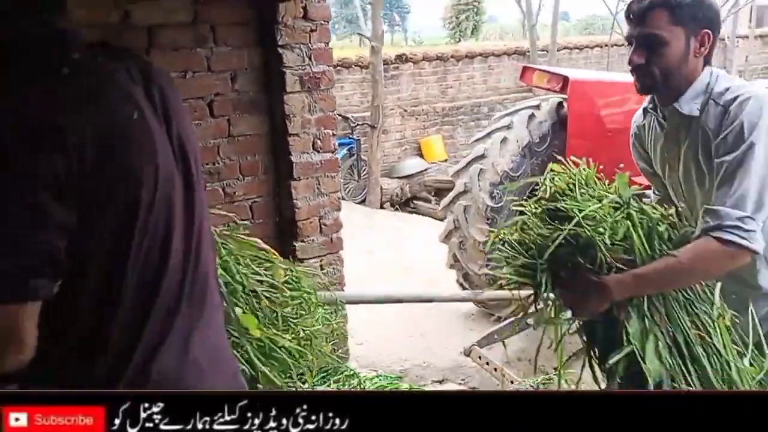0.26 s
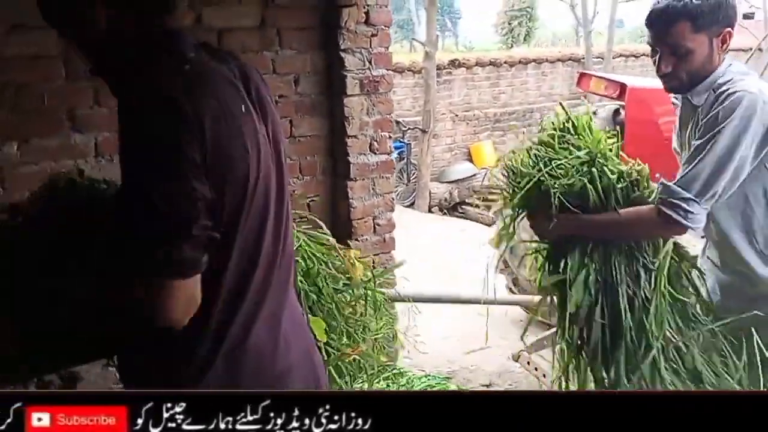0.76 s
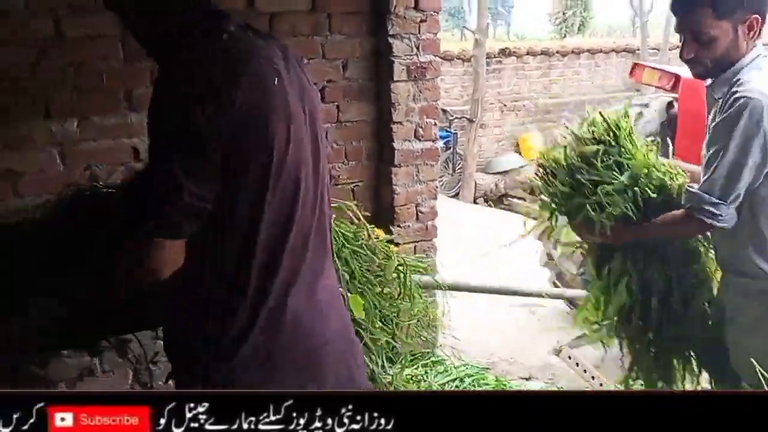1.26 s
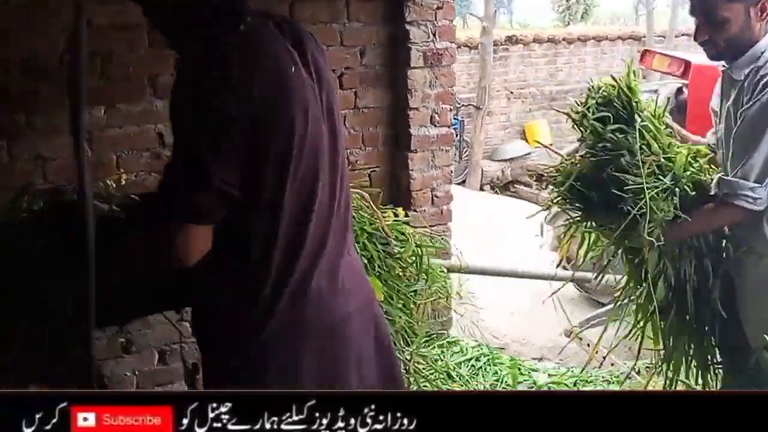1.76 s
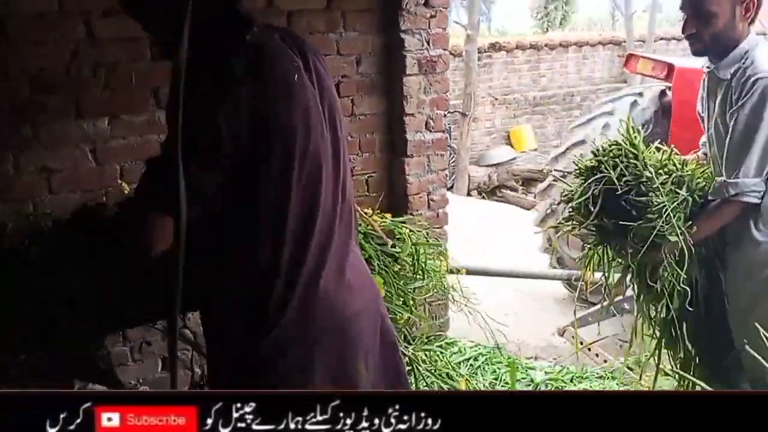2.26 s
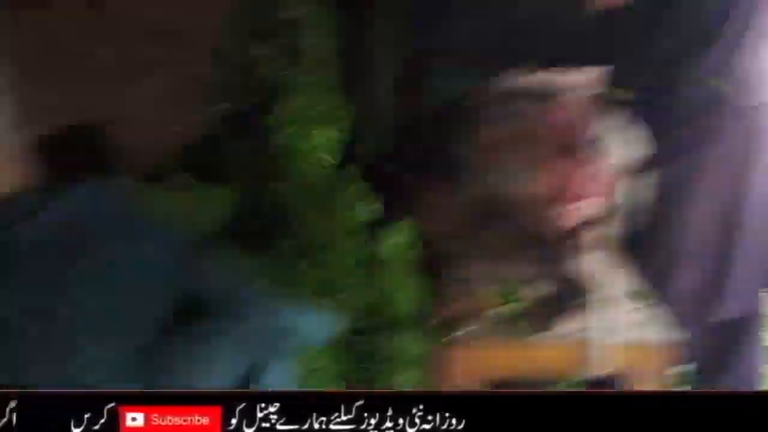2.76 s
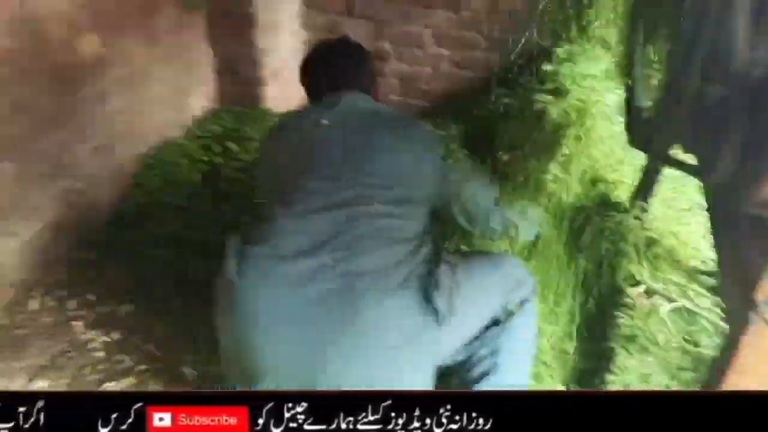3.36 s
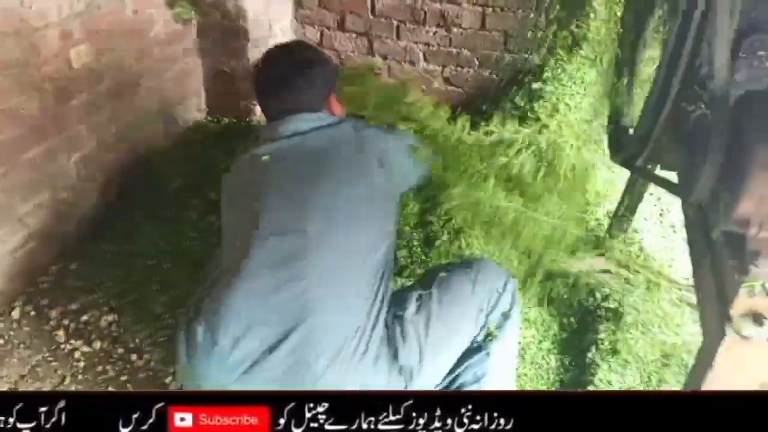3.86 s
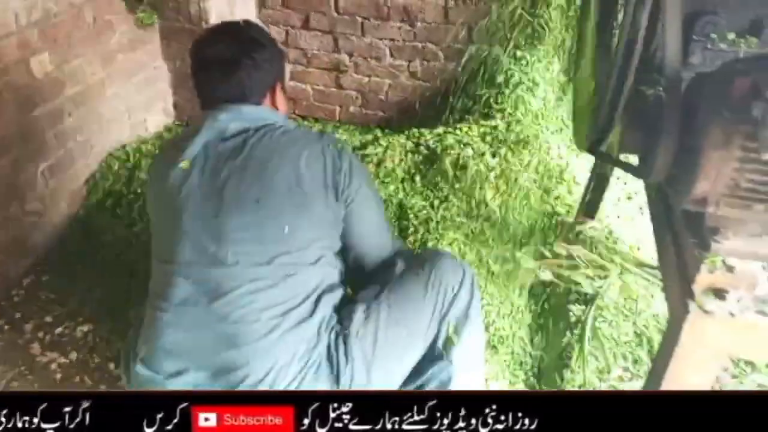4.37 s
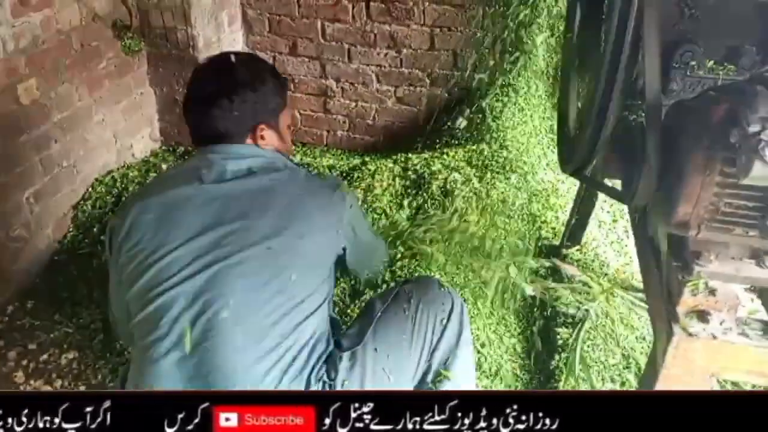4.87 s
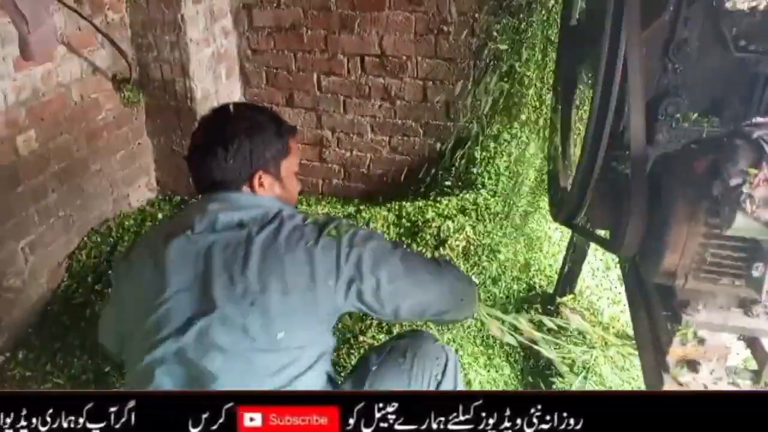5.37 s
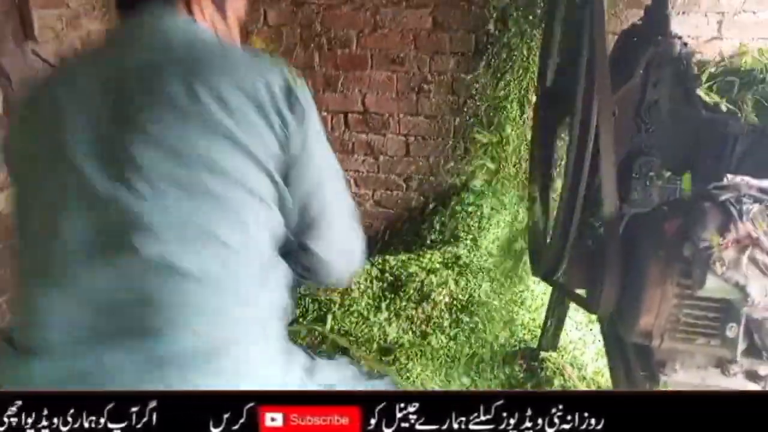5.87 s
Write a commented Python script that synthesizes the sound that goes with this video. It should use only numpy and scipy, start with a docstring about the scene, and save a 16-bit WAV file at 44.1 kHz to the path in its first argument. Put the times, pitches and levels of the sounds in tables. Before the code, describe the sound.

A chaff cutter shears green fodder in fast even crunching strokes, its gears rattling and whining with dry iron squeals over a faint engine hum.

```python
"""A flywheel chaff cutter in a brick shed: its knives shear green stalks over seven times a second, as
swept crowds of clicks, and the thrown chaff lands in soft thuds of blurred tone and noise.
Feed gears rattle and ring through iron modes, and dry iron squeals as fluttering, sagging tones.
The tractor that drives it hums outside, as steady lines over a rumble.
Halfway through, the microphone moves partway from the feed trough to the outlet, then drifts back."""
import sys
import numpy as np
from scipy import signal
from scipy.fft import rfft, irfft, next_fast_len
from scipy.io import wavfile
from scipy.ndimage import uniform_filter1d, map_coordinates

SR = 44100
rng = np.random.default_rng(int(sys.argv[2]) if len(sys.argv) > 2 else 0)


def unload_wav(signal):
    """Save mono or channel-first audio to the path in sys.argv[1] as 16-bit WAV at rate SR, clipped to [-1, 1]."""
    wavfile.write(
        sys.argv[1],
        SR,
        np.round(np.clip(np.atleast_2d(signal).T, -1, 1) * 32767).astype(np.int16),
    )


N = 270288

# microphone position: (time [s], position [0 at the trough, 1 at the outlet])
MIC_POSITION = [(0, 0.08), (2.6, 0), (3.1, 0.4), (6.13, 0)]
# low rumble, colour of the engine and of the bump: (frequency [Hz], relative level [dB])
RUMBLE_COLOUR = [(20, -36), (42, -25), (55, 5), (85, 2.5), (135, 3), (180, -7.5), (400, -29)]

# the flywheel turns steadily and carries two knives
FIRST_CUT_S, CUT_PERIOD_S = -0.0335, 0.13536
TOOTH_HZ = 102.3  # gear teeth meshing per second


def amp(db):
    """Decibels to gain."""
    return 10 ** (np.asarray(db) / 20)


def unit(x):
    """Scaled to rms 1."""
    return x / np.sqrt(np.mean(x ** 2) + 1e-20)


def along(points, hz):
    """(Hz, value) points read on a log frequency axis."""
    f, v = np.transpose(points)
    return np.interp(np.log(hz + 1), np.log(f), v)


def curve(points):
    """(s, value) points joined into one value per sample."""
    s, values = np.transpose(points)
    return np.interp(np.arange(N) / SR, s, values)


def between(trough, outlet):
    """A value that follows the microphone between the trough and the outlet."""
    return trough + (outlet - trough) * np.clip(curve(MIC_POSITION), 0, 1)


def bell(t, centre_s, width_s):
    """A smooth swell of height 1."""
    return np.exp(-.5 * ((t - centre_s) / width_s) ** 2)


def wobble(rate):
    """A smooth random curve, rate knots a second."""
    knots = rng.standard_normal(int(N * rate / SR) + 4)
    return map_coordinates(knots, [np.arange(N) * rate / SR])


def filtered(x, response):
    """x times a complex response of frequency."""
    m = next_fast_len(N + SR // 2)
    return irfft(rfft(x, m) * response(np.fft.rfftfreq(m, 1 / SR)), m)[:N]


def coloured(x, spectrum):
    """x shaped by the given colour, at rms 1."""
    return unit(filtered(x, lambda hz: amp(along(spectrum, hz))))


def hiss(spectrum):
    """Fresh noise of the given colour, at rms 1."""
    return coloured(rng.standard_normal(N), spectrum)


def ringing(x, modes):
    """x through a set of damped resonances, at rms 1."""
    def response(f):
        total = 0
        for k, (centre, width, db) in enumerate(modes):
            mode = 1j * f * width / (centre * centre - f * f + 1j * f * width)
            total = total + (-1) ** k * amp(db) * mode  # neighbours alternate in sign
        return total
    return unit(filtered(x, response))


def snaps(rate, spread_db):
    """Random clicks of uneven size, rate a second, at rms 1."""
    happens = rng.random(N) < rate / SR
    return unit(happens * rng.standard_normal(N) * amp(spread_db * rng.standard_normal(N)))


def patchy(x, depth_db, size):
    """x with a randomly changing colour; longer frames (size, samples) give finer, slower patches."""
    z = signal.stft(x, nperseg=size)[2]
    field = uniform_filter1d(rng.standard_normal(z.shape), size=3, axis=0)
    field = uniform_filter1d(field, size=4, axis=1)
    return unit(signal.istft(z * amp(depth_db * unit(field)), nperseg=size)[1][:N])


def strokes():
    """For each pass of a knife: its samples and their time since the blade entered."""
    t = np.arange(N) / SR
    for s in np.arange(FIRST_CUT_S, N / SR, CUT_PERIOD_S):
        near = slice(max(0, int((s - .02) * SR)), int((s + .13) * SR))
        yield near, t[near] - s


def knives(clump_db=1.0, lean_spread_db=2.0, bite_spread_db=1.5, dulling_db=3, crisp_hz=7500,
           cut_spread_db=0.53):
    """Each knife snaps a crowd of stalks and bites hardest as the last ones meet the ledger plate."""
    # shearing, as the fodder runs thick or thin: (time [s], level [dB])
    feed = [(0, -30.5), (.6, -26.5), (1.75, -28.5), (2.2, -28.2), (2.9, -29), (4.2, -31), (5.1, -32.5),
            (6.1, -31.5)]
    # colour of the snapping stalks: (frequency [Hz], relative level [dB])
    shear_colour = [(70, -31), (200, -13.5), (600, -5), (1700, -3), (2650, -5.5), (3150, -1.5),
                    (3600, -4.5), (4000, 2.5), (4500, -2.5), (6100, 3), (8100, -6.5), (9700, -2.5),
                    (11200, -10), (12300, -21.5), (15700, -29.5)]
    attack_s, release_s, bite_s, bite_width_s = 0.027, 0.05, .049, 0.0048
    bite_db = between(6, -5)  # extra level of the bite
    hold_s = between(0.053, 0.039)  # the tail of the sweep does not carry round to the outlet
    treble_db = between(-0.8, 5.5)  # crispness of the shearing
    feed_db = curve(feed)
    shear, crisp = np.zeros((2, N))
    for near, age in strokes():
        lean, handful, bite = rng.standard_normal(3)
        sweep = np.interp(age, [0, .07], [-1, 1])
        attack = np.clip(age / attack_s + .5, 0, 1) ** 2
        release = 1 / (1 + np.exp(np.log(1000) * (age - hold_s[near]) / release_s - 2))
        # the bundle lies thicker at one end of the sweep
        stalks_db = feed_db[near] + cut_spread_db * handful + lean_spread_db * lean * sweep
        extra_db = (bite_db[near] + bite_spread_db * bite) * bell(age, bite_s, bite_width_s)
        cut = attack * release * amp(stalks_db + extra_db)
        shear[near] += cut
        # the buried blade sounds duller than the entering one
        crisp[near] += cut * amp(-dulling_db * sweep)
    # hollow stalks part in clumps, each with its own pitch; no two handfuls have the same colour
    stalks = patchy(snaps(rate=20000, spread_db=1.5), depth_db=3.9, size=700)
    clumps = patchy(stalks, depth_db=1.5, size=128) * amp(clump_db * wobble(160))
    stalks = coloured(clumps, shear_colour)
    treble = filtered(stalks, lambda hz: 1 - 1 / (1 + (hz / crisp_hz) ** 4))
    return shear * (stalks - treble) + amp(treble_db) * crisp * treble


def chaff(thud_blur=0.59, wad_spread_db=2, hollow_db=2.5, puff_db=-2.0):
    """Every cut throws a wad of chaff, which leaves with a pat and lands with a soft thud."""
    # ordinary wads: (time [s], level before the hollow and puff trims [dB])
    wads = [(0, -41), (.7, -40), (1.8, -41), (2.2, -56), (3.2, -43), (3.9, -45), (4.4, -40), (6.1, -44.5)]
    # thick wads: (time of the cut that throws them [s], level before the same trims [dB])
    thick_wads = [(.372, -31), (1.185, -33), (1.455, -32), (1.726, -33), (3.213, -36), (4.163, -31),
                  (4.435, -33), (4.975, -34), (5.787, -34)]
    # colour of the puff of noise in each thud: (frequency [Hz], relative level [dB])
    thud_colour = [(60, -35), (120, -14.5), (230, -6), (340, 6.5), (430, 5.5), (560, -11.5), (900, -35),
                   (2000, -60)]
    second_knife_db = 1.5  # the second knife throws more chaff than the first
    average_db, hz_per_db = -40, 8  # heavier wads than the average sound lower
    land_s, land_width_s, leave_db = 0.05, 0.011, -8.5
    push, hollow = np.zeros((2, N))
    usual_db = curve(wads)
    usual_hz = between(480.8, 432.3)  # beside the heap the thuds sound deeper
    thick = {round((s - FIRST_CUT_S) / CUT_PERIOD_S): db for s, db in thick_wads}
    # a wad of chaff is a loose, heavily damped body: its pitch is blurred
    blur = unit(1 + thud_blur * wobble(170)) * np.exp(2j * thud_blur * wobble(110))
    for k, (near, age) in enumerate(strokes()):
        knife_db = second_knife_db * (k % 2 - .5)
        ordinary_db = usual_db[near].mean() + knife_db + wad_spread_db * rng.standard_normal()
        thud_db = thick.get(k, ordinary_db)
        thud_hz = usual_hz[near].mean() - hz_per_db * (thud_db - average_db)
        pat = amp(leave_db) * bell(age, 0.015, 0.0048)
        thud = amp(thud_db) * (pat + bell(age, land_s, land_width_s))
        push[near] += thud
        hollow[near] += thud * np.real(blur[near] * np.exp(2j * np.pi * thud_hz * age))
    return amp(hollow_db) * hollow + amp(puff_db) * push * hiss(thud_colour)


def teeth(scatter_s, spread_db, scrape_db):
    """Loose teeth knock once per mesh, unevenly, and scrape in between."""
    count = int(N / SR * TOOTH_HZ)
    chance = rng.standard_normal((count, 2))
    knock_s = np.arange(count) / TOOTH_HZ + scatter_s * chance[:, 0]
    at = np.clip(knock_s * SR, 0, N - 1).astype(int)
    knocks = np.bincount(at, amp(spread_db * chance[:, 1]), N)
    return unit(knocks - knocks.mean()) + amp(scrape_db) * snaps(rate=900, spread_db=1)


def whine(centre_hz=2165, waver=0.01707, mesh_depth=0.88):
    """The dry pinion sings without a break, wavering in pitch and chopped by its teeth."""
    t = np.arange(N) / SR
    phase = 2 * np.pi * np.cumsum(centre_hz * (1 + waver * wobble(14))) / SR
    mesh = 1 + mesh_depth * np.cos(2 * np.pi * TOOTH_HZ * t + 3.5 * wobble(13))
    return unit(mesh * amp(2.9 * wobble(35)) * np.sin(phase))


def gears(unsteady_db=0.1, load_db=0.85, load_lag_s=0.051, soft_hz=6500):
    """The cast feed gears ring under their teeth; the pinion is pressed harder at every cut."""
    # iron modes of the large gear: (frequency [Hz], width [Hz], relative level [dB])
    gear_modes = [(233.6, 22, -18.5), (416, 51, -14), (542, 30.6, -7.5), (619, 43, -7), (711.4, 5.1, -3.5),
                  (801, 21.6, -3.5), (922, 59, -10.5), (1230.5, 55.7, -1), (1305, 43, 2.5),
                  (1357, 44, -1.5), (1474, 31, -17)]
    # iron modes of the pinion: (frequency [Hz], width [Hz], relative level [dB])
    pinion_modes = [(2070, 85, -4), (2104, 18.5, 2.5), (2157, 25.6, -0.5), (2241, 20.4, 2),
                    (2358, 17, -8.5), (2567, 46, -23.5), (2826, 28, -19.5), (3117, 38, -15.5),
                    (3300, 10, -16), (3750, 74, -24)]
    gear_db = between(-32.5, -37) + unsteady_db * wobble(2.73)
    since_load = np.arange(N) / SR - FIRST_CUT_S - load_lag_s
    load = np.cos(2 * np.pi * since_load / CUT_PERIOD_S)
    pinion_db = -28 + load_db * load + unsteady_db * wobble(2.49)  # shared by its ring and whine
    # the contact point wanders, so now one mode leads, now another
    gear_teeth = teeth(scatter_s=0.00052, spread_db=3, scrape_db=-2.0)
    gear = ringing(patchy(gear_teeth, depth_db=3.5, size=2048), gear_modes)
    pinion_teeth = teeth(scatter_s=.0004, spread_db=2.5, scrape_db=-1.5)
    pinion = ringing(patchy(pinion_teeth, depth_db=5.0, size=2048), pinion_modes)
    singing = amp(-4.0) * pinion + amp(-9) * whine()
    rattle = amp(gear_db) * gear + amp(pinion_db) * singing
    # the gears' ring is rolled off above soft_hz, so the tooth ticks stay faint
    return filtered(rattle, lambda hz: 1 / (1 + (hz / soft_hz) ** 4))


def chirps(detune=0.01235, spread_db=2.0, count=11, gap_s=.6, length_s=.1):
    """Short squeals at random moments, one per mode in each gap, as rows like the timed ones."""
    # modes that chirp: (pitch [Hz], mean level before the squeal trim [dB])
    chirp_modes = [(798, -44.5), (2190, -37), (2850, -50), (3150, -47)]
    rows = []
    for k in range(count):
        for hz, db in chirp_modes:
            start_s = (k + rng.random()) * gap_s
            pitch_hz = hz * (1 + detune * rng.standard_normal())
            rows.append((start_s, length_s, pitch_hz, db + spread_db * rng.standard_normal()))
    return rows


def squeals(rough=0.48, beat_db=2.0, drift=0.0096, sag=0.0096, overhang=.28):
    """Stick and slip make one iron mode swell and flutter; its pitch sags as the pressure eases."""
    # squeals and low groans of dry iron, loud and faint, at set times:
    # (start before overhang [s], length before overhang [s], pitch [Hz], level before trim [dB])
    timed_squeals = [(0.102, 0.13, 545.5, -34.0), (0.13, 0.069, 243, -42.5), (0.225, 0.17, 1211, -33.5),
                     (0.25, 0.28, 719, -32), (0.541, 0.06, 797, -31), (0.59, 0.08, 2187, -26.5),
                     (0.618, 0.14, 1268, -27.5), (0.831, 0.054, 790, -32.5), (0.903, 0.17, 1242, -23.5),
                     (0.931, 0.13, 717, -30.5), (0.964, 0.06, 247, -41), (1.036, 0.039, 2220, -27.5),
                     (1.262, 0.095, 1220, -29), (1.328, 0.089, 3140, -38.5), (1.447, 0.12, 2220, -27),
                     (1.485, 0.13, 1235, -26.5), (1.628, 0.096, 2215, -27.5), (1.979, 0.07, 1227, -21.5),
                     (2.074, 0.064, 1214, -19), (2.255, 0.028, 1250, -16), (2.299, 0.14, 1219, -23),
                     (2.527, 0.11, 1220, -30.5), (2.676, 0.058, 1233, -24), (2.802, 0.056, 2083, -27.5),
                     (2.821, 0.14, 1216, -26), (3.001, 0.15, 2082, -30), (3.097, 0.087, 3160, -38.5),
                     (3.365, 0.057, 3260, -36.5), (3.799, 0.081, 796, -30.5), (3.8, 0.15, 2075, -27),
                     (4.577, 0.088, 235, -44), (4.954, 0.079, 2205, -26.5), (5.138, 0.072, 800, -30),
                     (5.505, 0.055, 2080, -28.5), (5.755, 0.084, 2083, -23.5), (5.767, 0.14, 1238, -34.5),
                     (6.03, 0.085, 2077, -28.5)]
    t = np.arange(N) / SR
    flutter = (1 + rough * (wobble(120) + 1j * wobble(120))) * amp(beat_db * wobble(55))
    waver = drift * wobble(30)
    random_squeals = [row for row in chirps() if row[0] < t[-1]]
    out = np.zeros(N)
    for s, length, hz, db in list(timed_squeals) + random_squeals:
        extra_s = overhang * length  # added at both ends
        on = slice(max(0, int((s - extra_s) * SR)), int((s + length + extra_s) * SR))
        progress = np.linspace(-1, 1, len(t[on]))
        swell = np.cos(np.pi / 2 * progress)
        phase = 2 * np.pi * np.cumsum(hz * (1 + waver[on] - sag * progress)) / SR
        out[on] += amp(db) * unit(swell * np.real(flutter[on] * np.exp(1j * phase)))
    return amp(-1.5) * out  # squeal trim


def tractor(rumble_db=-53.5, screen_db=-4):
    """The engine hums and rumbles outside, under the rush of belt and flywheel."""
    # engine lines as heard at the trough: (frequency [Hz], rms level [dB])
    engine_lines = [(55.4, -69), (76, -71), (128, -69)]
    # colour of the rush: (frequency [Hz], relative level [dB])
    rush_colour = [(40, -40), (150, -22), (280, -3), (560, -1.5), (1000, -12), (1700, -7.5), (2500, 2.5),
                   (2800, -18), (4400, -19), (8200, -17), (10000, -14.5), (12000, -28), (15700, -47)]
    t = np.arange(N) / SR
    hum = np.zeros(N)
    for hz, db in engine_lines:
        hum += amp(db) * np.sqrt(2) * np.sin(2 * np.pi * hz * t + 0.32 * wobble(3.3))
    # the wall screens the tractor from the outlet
    engine = amp(between(0, screen_db)) * (hum + amp(rumble_db) * hiss(RUMBLE_COLOUR))
    rush_db = -45 - curve(MIC_POSITION)
    return engine + amp(rush_db) * hiss(rush_colour)


def shed(x, count=24):
    """The brick walls answer briefly, the treble dying first, as echoes of decaying noise."""
    # decay of the shed: (frequency [Hz], time to fall 60 dB [s])
    decay = [(200, 0.11), (2000, 0.17), (4000, 0.09), (10000, 0.039)]
    hz, t, z = signal.stft(rng.standard_normal((count, SR // 4)), SR, nperseg=256)
    fading = z * amp(-60 * t / along(decay, hz)[:, None])
    tails = signal.istft(fading, SR, nperseg=256)[1]
    out = np.zeros(N + SR)
    # each stretch of sound gets a freshly drawn short echo
    for part, tail in zip(np.array_split(np.arange(N), count), tails):
        echo = signal.fftconvolve(x[part], tail / np.linalg.norm(tail))
        out[part[0]:][:len(echo)] += echo
    return out[:N]


def bump(centre_s=5.75, width_s=0.033, level_db=-43.5):
    """A dull low bump: a short swell of rumbling noise."""
    return amp(level_db) * bell(np.arange(N) / SR, centre_s, width_s) * hiss(RUMBLE_COLOUR)


def scene():
    """Cutter, shed and tractor at one microphone."""
    cutting = knives() + chaff()
    drive = gears() + squeals()
    echoes = shed(amp(-5.5) * cutting + amp(-15.5) * drive)
    return (cutting + drive + echoes + tractor() + bump())[None]


def record(dry, top_hz=15750):
    """The phone keeps nothing above its band limit."""
    return filtered(dry[0], lambda hz: hz < top_hz)[None]


dry = scene()
out = record(dry)
unload_wav(out)
```